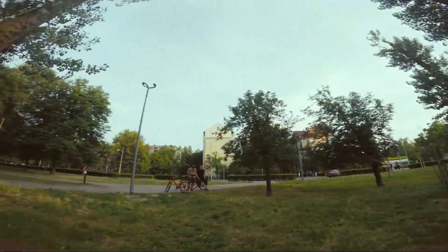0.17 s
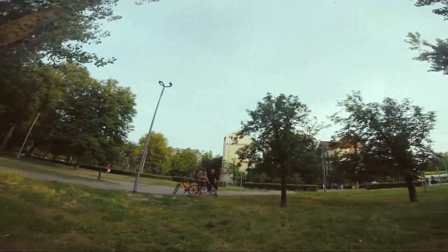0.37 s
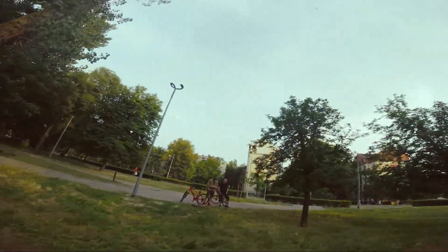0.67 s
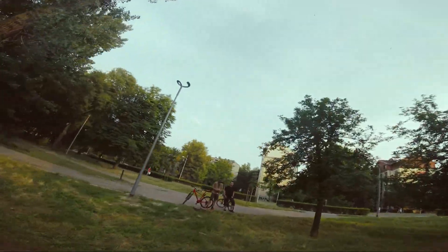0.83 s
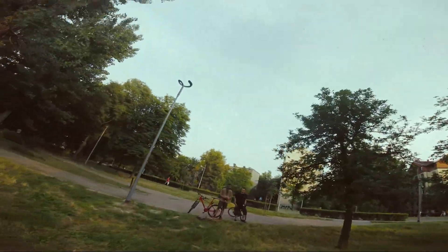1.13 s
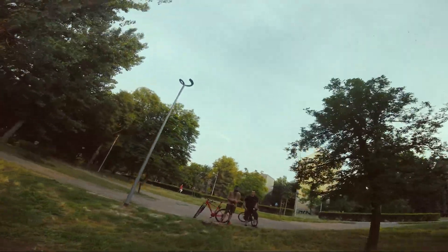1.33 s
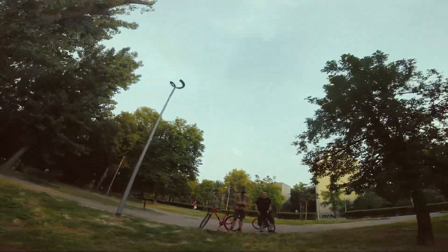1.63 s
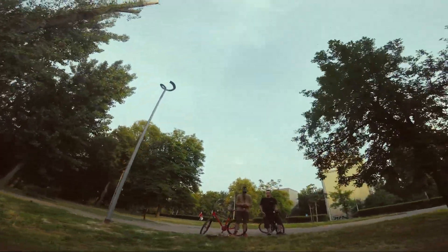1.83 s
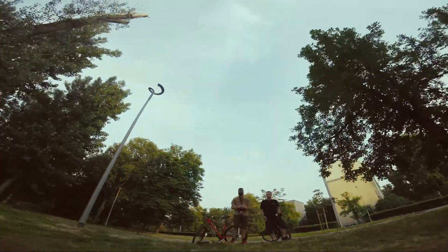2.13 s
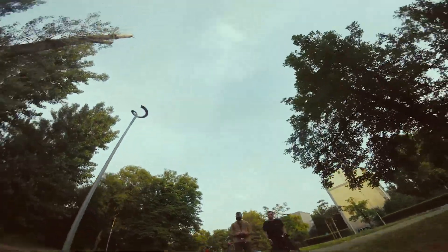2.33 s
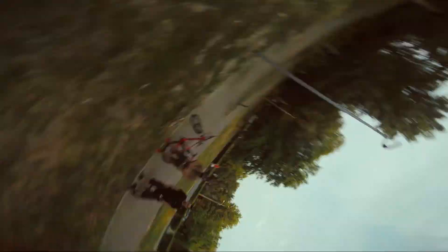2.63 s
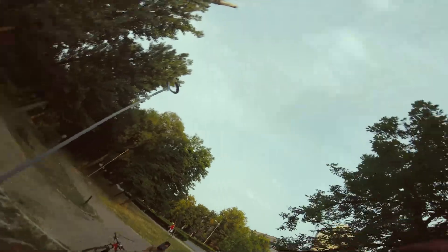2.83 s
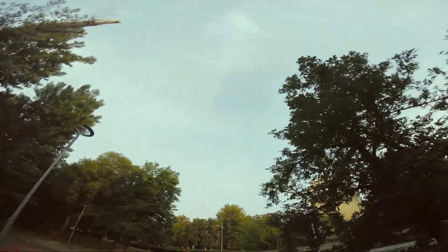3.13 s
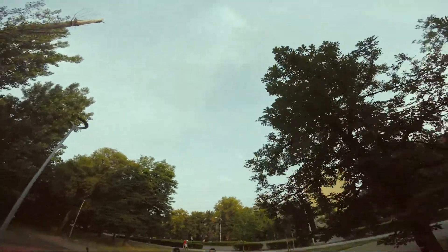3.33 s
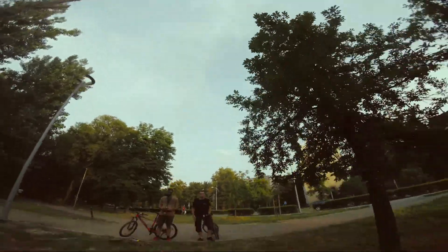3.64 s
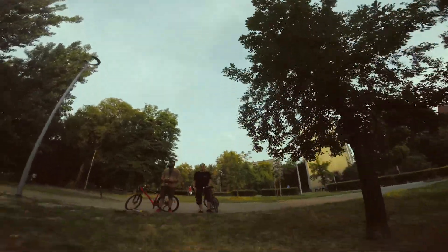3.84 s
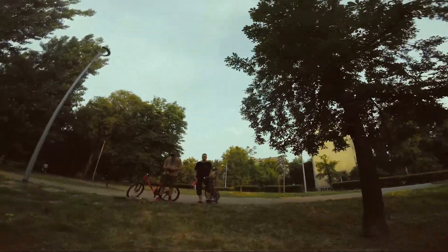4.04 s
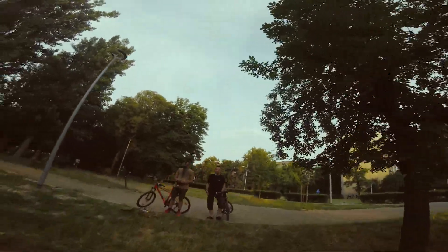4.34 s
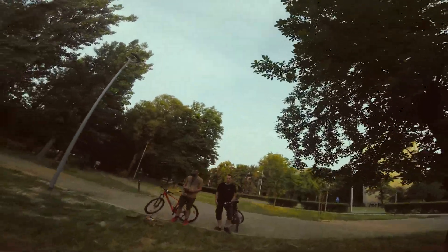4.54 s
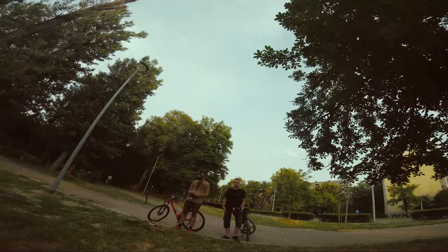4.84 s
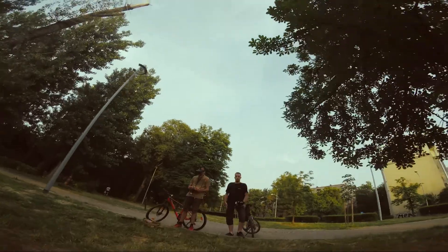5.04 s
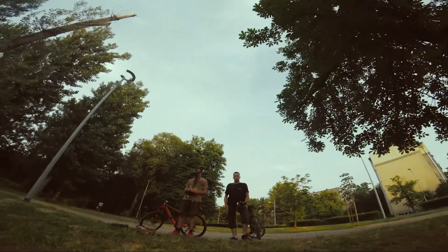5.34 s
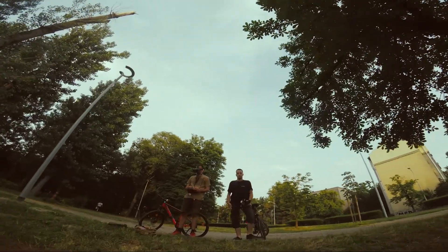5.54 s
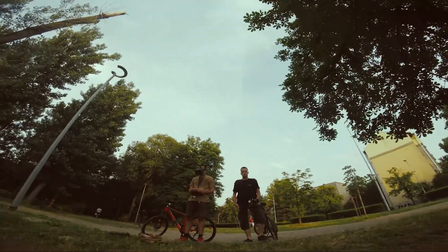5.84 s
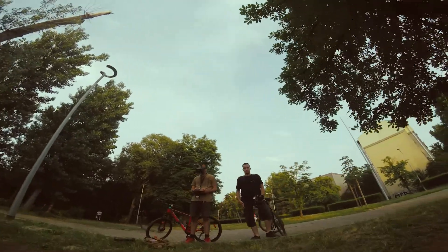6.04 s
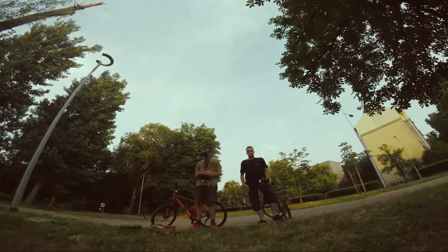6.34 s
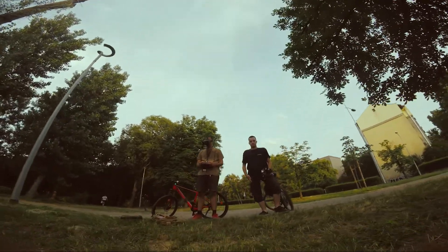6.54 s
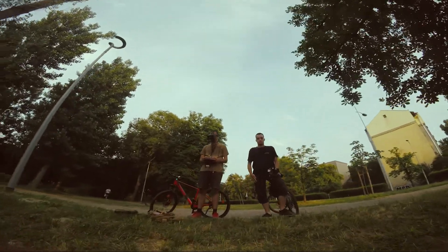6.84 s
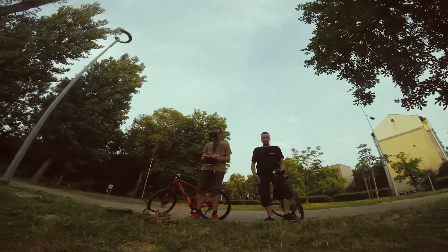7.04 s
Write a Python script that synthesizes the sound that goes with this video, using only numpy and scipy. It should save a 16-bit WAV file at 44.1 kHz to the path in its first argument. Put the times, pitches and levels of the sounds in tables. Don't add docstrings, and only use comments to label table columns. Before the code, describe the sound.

Harsh propeller whine heard from aboard a small drone, rising and dropping with throttle, two brief low lulls with thin motor whistle, windy thumps.

```python
import sys
import numpy as np
from scipy import signal
from scipy.fft import rfft, irfft, next_fast_len
from scipy.io import wavfile
from scipy.ndimage import uniform_filter1d, minimum_filter1d, map_coordinates

SR = 44100
rng = np.random.default_rng(int(sys.argv[2]) if len(sys.argv) > 2 else 0)


def wrap_up_sound(samples):
    columns = np.atleast_2d(samples).T
    tamed = np.clip(columns, -1, 1)
    steps = np.round(tamed * 32767).astype(np.int16)
    wavfile.write(sys.argv[1], SR, steps)


def invert_db(level):
    return 10 ** (np.asarray(level, dtype=float) / 20)


N = 317079

# time_s, level_db
WIDTH = [(0, -40.5), (1.2, -43), (1.35, -74), (1.65, -78), (1.8, -55), (1.95, -77), (2.1, -56.5),
         (3.0, -49), (3.15, -60.5), (3.75, -57), (4.05, -72), (4.2, -56.5), (4.8, -72), (5.7, -83),
         (7.19, -94)]
# low_hz, high_hz
WIDTH_BANDS = [(300, 1200), (1200, 6200), (6200, 13500)]
# widest_db, share_of_change, drift_db_per_s
WIDTH_LAW = [(-47, 0.97, 1), (-62.5, 0.52, -0.1), (-63.5, 0.1, -1.5)]
# centre_hz, width_hz, level_db
WIDTH_LINES = [(397, 53, -5), (822, 65, -12), (1630, 38, -27), (2370, 90, -25.5), (3260, 130, -32.5),
               (5000, 570, -45.5), (7300, 1500, -45), (10000, 1700, -45.5)]

# time_s, microphone_wind_db, stirred_inflow_db
AIR = [(0, -42.5, -1), (.7, -42.5, -1.5), (1.3, -35.5, 4.5), (1.8, -37, 3.5), (2.15, -38.5, 0.5),
       (2.35, -37.5, -4), (2.58, -35.5, -19), (2.72, -32.5, -6.5), (2.9, -43, -11.5), (3.15, -38.5, -5.5),
       (3.38, -36, 0.5), (3.5, -35, 2.5), (3.62, -34.5, 1.5), (4.38, -43, -2), (4.66, -35, -1),
       (4.85, -35, 7.5), (5.4, -41, -0.5), (6.15, -46.5, 1), (7.19, -40.5, 1.5)]
# frequency_hz, level_db_per_hz
BUFFET = [(12, -15), (28, -14.5), (54, -5.5), (100, -8.5), (140, -7), (190, -6.5), (300, -39), (400, -66)]
# frequency_hz, level_db_per_hz
THUMP = [(12, -8), (33, -1), (65, -5), (110, -28.5)]
# peak_s, over_calm_db, half_length_s
THUMPS = [
    (1.7, 18, .3),
    (2.42, 23, .08),
    (2.72, 29, 0.11),
    (3.58, 36, 0.19),
    (4.8, 18, .1),
    (5.22, 23, .1),
]
# frequency_hz, level_db_per_hz
SLIPSTREAM = [(530, -33), (900, -10), (1890, -8.5), (2130, -14), (2990, -34), (4060, -35), (6430, -29),
              (12300, -36.5), (15000, -63)]
# centre_hz, width_hz, level_db
CASE_RING = (6430, 110, -70)
# peak_s, change_db, half_length_s
RINGS = [
    (3.17, 3, .1),
    (3.49, 8, .08),
    (4.75, 6, .07),
]
# frequency_hz, level_db_per_hz
FRAME = [(100, -11), (200, -1), (290, -17.5), (390, -0.5), (600, -5.5), (800, -8), (1000, -14.5),
         (1300, -12.5), (1900, -57.5)]
# peak_s, change_db, half_length_s
LULLS = [
    (3.55, 1, 0.11),
    (4.5, -4.5, 0.22),
]
# frequency_hz, level_db_per_hz
CHURN = [(900, -20.5), (1300, 1.5), (1600, 7), (2300, -7.5), (2950, 1.5), (3700, -22), (5000, -14.5)]
# frequency_hz, level_db_per_hz
WASH = [(1940, -6), (3300, 1), (4030, -12.5), (6340, -1), (8000, -8), (9340, -11.5), (10700, -22),
        (13900, -36), (15500, -59)]
# peak_s, change_db, half_length_s
CATCHES = [
    (2.42, 2.5, 0.085),
    (2.465, 8, 0.034),
    (2.71, 8.5, 0.05),
    (3.48, 6.5, 0.066),
    (3.6, 2, 0.091),
    (4.78, 3, 0.079),
    (7.19, -1.5, 0.1),
]

# time_s, shaft_hz
THROTTLE = [(0, 164.1), (1.0, 139.3), (1.4, 143.1), (1.6, 163.5), (2.375, 178.3), (2.45, 72.28),
            (3.46, 69.83), (3.58, 190.4), (4.22, 188.1), (4.37, 66.26), (4.68, 78.3), (4.805, 143.6),
            (5.5, 162.5), (6.3, 173.4), (6.8, 172.2), (7.09, 152.6), (7.19, 288.5)]
# peak_s, faster_percent, rise_s, fall_s
BLIPS = [(.4, 29, 0.4, 0.48), (1.6, -3.5, .12, 0.13), (2.235, 3, 0.055, .05), (2.3, 108, 0.17, 0.29),
         (3.64, 33, .14, 0.19), (3.79, 2, 0.085, 0.098), (3.87, 1, 0.074, 0.051), (4.06, 48.5, .2, 0.21),
         (4.55, -6, 0.1523, 0.1006), (4.995, 11, .055, .11), (5.18, 53.5, 0.29, .2),
         (5.71, 19.5, .13, 0.21), (5.27, 6, 0.0804, 0.0904), (5.9, 3.5, 0.096, 0.075), (6.0, -10, 0.21, .2),
         (6.08, -4.5, 0.072, 0.15), (6.17, -12, 0.21, .14), (6.73, 14, .11, 0.11)]
PACE = [.955, 1.001, 1.045, 1.02]
# peak_s, faster_percent, rise_s, fall_s
TRIMS = [
    [(1.6, -4, 2.08, 0.57), (1.2, 4, 0.3003, 0.2983), (2.3, 3, 0.1002, 0.0805), (2.44, -28, 0.079, .12),
     (4.87, -5, 0.0836, 0.1)],
    [(1.2, 3, 0.29, 0.29), (2.425, 56.2, .04, 0.13), (2.67, 29.8, 0.05287, 0.046), (2.714, 90, 0.029, 0.02),
     (2.74, 85, 0.06, 0.068)],
    [(.28, 4.003, .15, 0.11), (1.75, 4, 0.22, 0.23), (2.0, 8, 0.52, .2), (2.3, 0.992, 0.11, 0.095),
     (2.72, 250, 0.038, .05), (3.52, 18, 0.057, 0.083), (3.68, -3, .1, .15), (5.2, -3, .15, .1),
     (4.87, 7.1, 0.079, 0.1)],
    [(0, 4, 0.078, 0.11), (.62, -3, 0.31, .15), (1.1, 6, 0.36, 0.39), (2.3, -1, 0.2, 0.066),
     (2.415, -22, 0.026, 0.072), (2.5, 90, 0.049, 0.1095), (3.83, 4, 0.091, 0.059),
     (3.96, -8, 0.086, 0.058), (4.06, 2, 0.044, .05), (4.14, -5, 0.047, .05), (4.23, 4.5, 0.095, 0.11),
     (4.78, -7, 0.07, 0.047), (4.87, -14, 0.072, 0.061), (5.0, -5, 0.12, 0.099), (5.2, -5.5, 0.14, 0.085),
     (5.31, 2, 0.058, 0.072), (5.45, 4.5, 0.097, 0.12), (5.9, 2, 0.095, .1), (6.95, -3, .1, 0.093),
     (7.12, -11, 0.049, 0.032), (6.05, 3, 0.22, 0.18), (7.19, -22.5, 0.12, 0.092)],
]
# peak_s, faster_percent, rise_s, fall_s
IDLING = [
    [(2.8, -9, .3, .6), (3.2, -11.5, .17, .3), (3.26, -14, .06, .12)],
    [(2.62, 30, .17, .45), (3.3, -17, .08, .2)],
    [(3.28, 9, .6, .14)],
    [(3.27, -19, .13, .15)],
]

# shaft_hz, level_db
MOUNT = [(78, -63), (95, -27), (125, -31), (155, -25), (195, -23.5), (235, -30), (260, -31), (365, -28)]
# peak_s, change_db, half_length_s
SHAKE_DIPS = [
    (0.813, -14, 0.019),
    (0.921, -16, 0.025),
    (2.23, -8, 0.06),
    (2.424, -9, .05),
    (2.598, -40, 0.15),
    (3.4, -13, 0.095),
    (4.58, -18, 0.18),
    (5.2, -5.5, 0.079),
    (5.27, -12, 0.061),
]
# peak_s, change_db, half_length_s
RATTLES = [
    (3.68, 13, 0.16),
    (4.17, 5, .12),
]
# time_s, faster_percent, relative_db
PARTNER = [(0, 12.7, -12), (.25, 7.42, -4.5), (.4, 6.78, -2.5), (.6, 12.07, -12), (1.0, 8.99, -7),
           (1.45, 6.98, -7), (1.75, 12.96, -8), (1.9, 10.1, -11), (2.1, 12.06, -15), (2.3, 7, -7),
           (4.78, 8, -12.5), (4.86, 29.1, 4), (4.92, 23.9, -9), (4.97, 8.1, -9), (5.2, 6.07, -3),
           (5.4, 5.7, -12), (5.75, 7.16, -10.5), (5.95, 6.83, -15), (6.2, 7.83, -13), (6.4, 7.01, -13),
           (6.65, 6.16, -5.5), (6.8, 3.87, 0), (6.95, 9, -9.5), (7.1, 8, -12), (7.15, 22, -13),
           (7.19, 38, -2)]

# shaft_order, relative_to_blade_tone_db
ORDERS = [(2, -17), (3, 0), (4, -20), (6, -13.5), (7, -32), (9, -21.5), (12, -27.5), (15, -30), (18, -33.5),
          (21, -38)]
# blade_tone_re_near_db, once_a_turn_re_blade_db
PLACE = [
    (-5, -2),
    (0.5, -30),
    (-4.5, -3.5),
]
BRIGHT = [-6, -2.5, 1.5]
# peak_s, change_db, half_length_s
BITE = [(2.28, 2.5, 0.18), (2.42, -12, 0.052), (2.55, -30, 0.11), (2.65, 0.5, 0.047), (2.7, -11, 0.019),
        (2.735, -13, 0.017), (2.765, -3, 0.02), (2.95, -5, 0.16), (3.3, -5, 0.085), (3.5, 4, 0.17),
        (3.68, 1.5, 0.11), (4.52, 3, 0.12), (4.88, 0.5, 0.096), (7.1, -0.5, 0.11)]
# peak_s, change_db, half_length_s
GRIPS = [
    [(4.1, -4, .15), (5.9, -3, .4), (2.64, -13, .05), (2.73, 13, 0.031), (3.05, 4, .25), (3.25, 14, .08),
     (3.42, -15, 0.074), (5.2, -2, 0.064)],
    [(4.16, 3, .1), (5.4, 3, .1), (7.14, 3, .06), (2.47, -4, .04), (2.665, 4, .03), (2.705, -8, 0.019),
     (2.76, 4, .03), (2.85, -6, .05), (3.1, -13, 0.23), (3.36, 2, 0.094)],
    [(.28, 1, 0.095), (.72, 4.5, 0.074), (1.5, 7.5, 0.11), (2.31, -1, .04), (2.64, -12, .05),
     (2.718, 6, 0.02), (3.1, -16, 0.39), (3.38, -9, 0.13), (4.52, -2, 0.21), (4.87, 2, 0.061),
     (5.36, 4.5, 0.071)],
]
# peak_s, overtones_db, half_length_s
EDGE = [
    (.4, -4, .3),
    (1.2, 4, .35),
    (2.425, 10, .03),
    (2.64, -7, .06),
    (3.52, 8, .07),
    (4.6, 13, .1),
    (4.745, 13, .06),
    (5.15, 2, .15),
    (6.45, -4, .3),
]
# frequency_hz, gain_db
PASSAGE = [(30, 0), (1500, 0), (2400, -3), (3400, 2), (4000, -5), (4700, -2), (6000, 1), (9000, -4)]
# frequency_hz, level_db
WHISTLE = [(3000, -91.5), (4500, -70), (5500, -71), (6500, -65.5), (8000, -63), (11500, -82), (13000, -110)]
# time_s, level_db
DRIVE = [(2.75, -16), (2.95, -7), (3.12, 5), (3.25, 1), (3.36, 8), (3.5, 8), (3.6, -14), (4.25, -14),
         (4.33, 2), (4.42, -3), (4.52, -6), (4.62, 2), (4.76, 5)]
# peak_s, change_db, half_length_s
SURGES = [
    [(3.14, 2, .12), (3.25, 1, .05), (3.4, -16, .1)],
    [(3.14, -9, .12), (3.25, 1, .04), (3.36, 2, .1)],
    [(3.1, -7, .25), (3.38, -14, .12), (4.52, -6, .2)],
]

LOADED_HZ = 132
HOVER_HZ, FULL_HZ = 167.3, 296.7


def unit(x):
    return x / np.sqrt(np.mean(x ** 2) + 1e-20)


def curves(rows, smooth_s=.002):
    s, *cols = np.transpose(rows)
    t = np.arange(N) / SR
    width = int(smooth_s * SR) + 1
    return [uniform_filter1d(np.interp(t, s, c), width) for c in cols]


def moments(rows):
    t = np.arange(N) / SR
    return sum(db * np.clip(1 - np.abs(t - s) / half, 0, 1) for s, db, half in rows)


def swells(rows):
    t, factor = np.arange(N) / SR, np.ones(N)
    for s, percent, rise, fall in rows:
        away = np.clip(np.where(t < s, (s - t) / rise, (t - s) / fall), 0, 1)
        factor *= 1 + percent / 100 * np.cos(np.pi / 2 * away) ** 2
    return factor


def wobble(rate):
    knots = rng.standard_normal(int(N * rate / SR) + 4)
    return map_coordinates(knots, [np.arange(N) * rate / SR])


def noise(gain, patchy_db=0.):
    z = signal.stft(rng.standard_normal(N), nperseg=512)[2]
    field = uniform_filter1d(rng.standard_normal(z.shape), 6, 0)
    field = uniform_filter1d(field, 8, 1)
    x = signal.istft(z * invert_db(patchy_db * unit(field)), nperseg=512)[1][:N]
    m = next_fast_len(N + 8192)
    spectrum = rfft(x, m) * gain(np.fft.rfftfreq(m, 1 / SR))
    return unit(irfft(spectrum, m)[:N])


def colour(points):
    f, db = np.transpose(points)
    return lambda hz: invert_db(np.interp(np.log(hz + 1), np.log(f), db, -120, -120))


def angle(hz, hunt):
    return 2 * np.pi * (np.cumsum(hz * (1 + hunt * wobble(30))) / SR + rng.random())


def octaves_under_load(hz):
    return np.log2(np.minimum(hz / LOADED_HZ, 1))


def channel_difference():
    def lines(f):
        return sum(invert_db(db) / (1 + ((f - hz) / width) ** 4) for hz, width, db in WIDTH_LINES)

    low_db, = curves(WIDTH)
    t, side = np.arange(N) / SR, np.zeros(N)
    for (db, share, drift), (lo, hi) in zip(WIDTH_LAW, WIDTH_BANDS):
        level_db = db + share * (low_db - low_db.max()) + drift * t
        band = noise(lambda f: lines(f) * (f > lo) * (f < hi), patchy_db=3.5)
        side += invert_db(level_db) * band
    return side


def wind(buffet_db):
    buffet = invert_db(buffet_db + 3.4 * wobble(11)) * noise(colour(BUFFET), patchy_db=0.5)
    thump = invert_db(-60.5 + moments(THUMPS)) * noise(colour(THUMP))
    return buffet + thump


def camera_case():
    hz, width, ring_db = CASE_RING
    level_db = ring_db + 2.5 * wobble(25) + moments(RINGS)
    ring = invert_db(level_db) * noise(lambda f: 1 / (1 + ((f - hz) / width) ** 2))
    slipstream = invert_db(-53.0 + 0.35 * wobble(22)) * noise(colour(SLIPSTREAM), patchy_db=1.0)
    return ring + slipstream


def frame_hum(hum_db):
    return invert_db(hum_db + .8 * wobble(20) + moments(LULLS)) * noise(colour(FRAME), patchy_db=2.5)


def prop_wash(churn_db, wash_db, beat):
    gust = wobble(4.9)
    chop = 1 + 0.12 * beat
    churn_db = churn_db - 3.0 + 0.21 * gust + 1.4 * wobble(40)
    wash_db = wash_db + 0.28 * gust + 0.31 * wobble(30)
    churn = invert_db(churn_db) * noise(colour(CHURN), patchy_db=1.0)
    wash = invert_db(wash_db) * noise(colour(WASH), patchy_db=1.5)
    return chop * (churn + wash)


def stirring(hz):
    wind_db, inflow_db = curves(AIR)
    inflow_db = inflow_db + moments(CATCHES)
    lag = 1 / (0.044 * SR)
    speeding_up = np.maximum(SR * np.gradient(np.log(hz)), 0)
    spool_db = np.clip(0.5 * signal.lfilter([lag], [1, lag - 1], speeding_up), 0, 11)
    over_hover = np.log2(np.maximum(hz / HOVER_HZ, 1))
    churn_db = -46 - 4.5 * over_hover + inflow_db + 0.49 * spool_db
    wash_db = churn_db - 5 + 9.5 * np.log2(np.minimum(hz, FULL_HZ) / HOVER_HZ) + 0.2 * spool_db
    hum_db = -39 + 0.28 * (wind_db - wind_db.mean()) + 0.22 * inflow_db + 0.76 * spool_db
    hum_db += -3 * over_hover - 2.5 * octaves_under_load(hz)
    return wind_db + .6 * spool_db, churn_db, wash_db, hum_db


def air(beat, hz):
    buffet_db, churn_db, wash_db, hum_db = stirring(hz)
    return wind(buffet_db) + camera_case() + frame_hum(hum_db) + prop_wash(churn_db, wash_db, beat)


def shafts():
    asked = curves(THROTTLE, smooth_s=0.022)[0] * swells(BLIPS)
    return [asked * pace * swells(trim + idle) for pace, trim, idle in zip(PACE, TRIMS, IDLING)]


def shake(hz):
    f, mount_db = np.transpose(MOUNT)
    turn = angle(hz, hunt=0.0065)
    octave = invert_db(-19.5 + 2.2 * wobble(22)) / (1 + ((2 * hz - 410) / 50) ** 2) + invert_db(-51)
    octave += invert_db(-24) / (1 + ((2 * hz - 520) / 70) ** 2)
    octave *= invert_db(moments(RATTLES))
    faster, partner_db = curves(PARTNER)
    partner_turn = angle(hz * (1 + faster / 100), hunt=0.0098)
    partner = invert_db(partner_db + 0.77 * wobble(10)) * np.sin(partner_turn)
    level = np.sqrt(2) * invert_db(np.interp(hz, f, mount_db) + moments(SHAKE_DIPS))
    return level * (np.sin(turn) + octave * np.sin(2 * turn) + partner)


def magnet_whistle(turn, hz, far_db, surge):
    cogging = 84
    rough = 1.05 * wobble(130)
    drive_db, = curves(DRIVE)
    level_db = drive_db + moments(surge) + .4 * far_db + 4.2 * wobble(30)
    return colour(WHISTLE)(cogging * hz) * invert_db(level_db) * np.sin(cogging * turn + rough)


def blade_tones(turn, hz, level_db, lump_db, upper_db):
    load_db = np.clip(12 * np.log2(hz / 210), -5, .8)
    load_db += np.clip(.6 * SR * np.gradient(np.log(hz)), 0, .4)
    slack = -octaves_under_load(hz)
    slack_db = {1: -9, 2: 9.5}
    overtone_db, through = upper_db + moments(EDGE), colour(PASSAGE)
    smear = .02 * wobble(90)
    tones = np.zeros(N)
    for order, db in [(1, lump_db), *ORDERS]:
        above = np.log2(max(order / 3, 1))
        sharp_db = load_db * above + (order > 3) * overtone_db
        sharp_db += slack * slack_db.get(order, 0)
        flutter_db = (2.0 + 1.1 * above) * wobble(25)
        level = np.sqrt(2) * invert_db(level_db + db + sharp_db + flutter_db) * through(order * hz)
        tones += level * np.sin(order * (turn + smear))
    return tones


def rotors(speeds):
    inflow_db = curves(AIR)[1]
    fade = 6 - .6 * inflow_db
    blade_db = -33.5 + moments(BITE) + octaves_under_load(speeds[1]) * fade
    tones, beat = np.zeros(N), np.zeros(N)
    for hz, (far_db, lump_db), surge, grip, upper_db in zip(speeds, PLACE, SURGES, GRIPS, BRIGHT):
        turn = angle(hz, hunt=.013)
        level_db = blade_db + moments(grip) + far_db + 0.5 * wobble(5.2)
        tones += blade_tones(turn, hz, level_db, lump_db, upper_db)
        tones += magnet_whistle(turn, hz, far_db, surge)
        beat += np.cos(3 * turn)
    return tones, beat


def scene():
    *speeds, loose = shafts()
    tones, beat = rotors(speeds)
    middle = tones + shake(loose) + air(beat, speeds[1])
    side = channel_difference()
    return np.array([middle + side, middle - side])


def roll_off(x):
    return signal.sosfilt(signal.butter(12, 15610, fs=SR, output="sos"), x)


def record(dry):
    limit, hold = .19, int(.012 * SR) + 1
    room = np.minimum(limit / (np.abs(dry).max(0) + 1e-9), 1)
    held = dry * uniform_filter1d(minimum_filter1d(room, hold), hold)
    top, hard = .185, 5
    soft = held / (1 + np.abs(held / top) ** hard) ** (1 / hard)
    return roll_off(soft)


dry = scene()
out = record(dry)
wrap_up_sound(out)
```